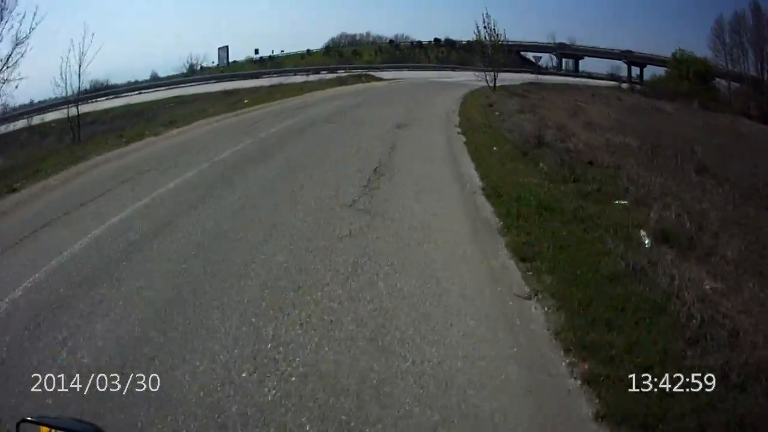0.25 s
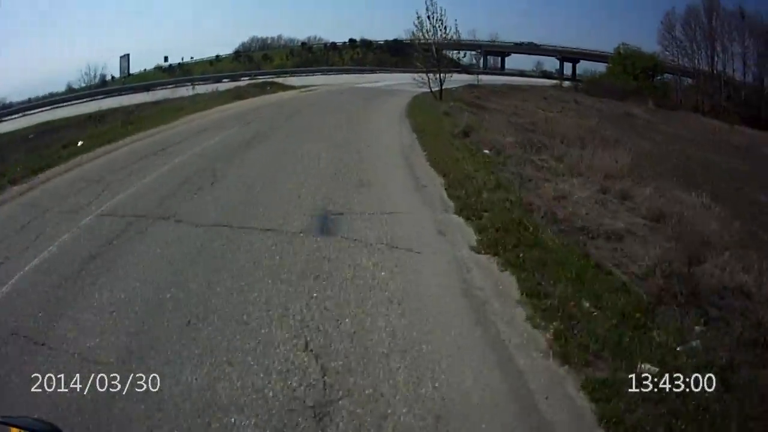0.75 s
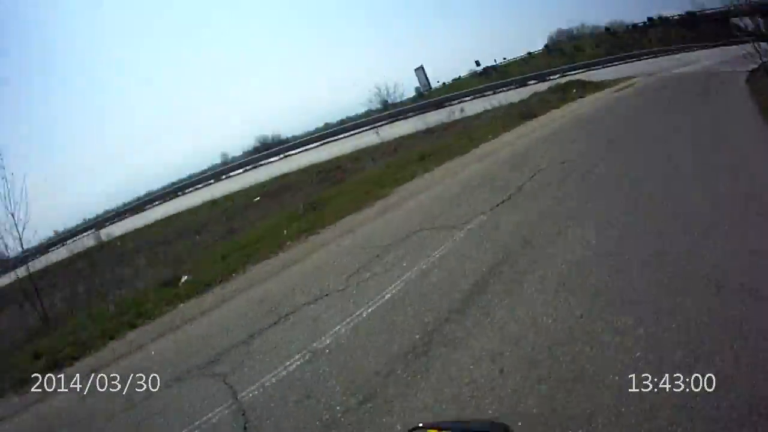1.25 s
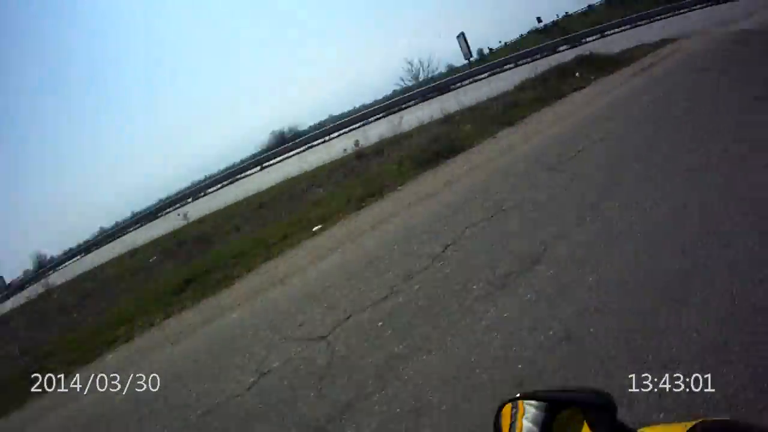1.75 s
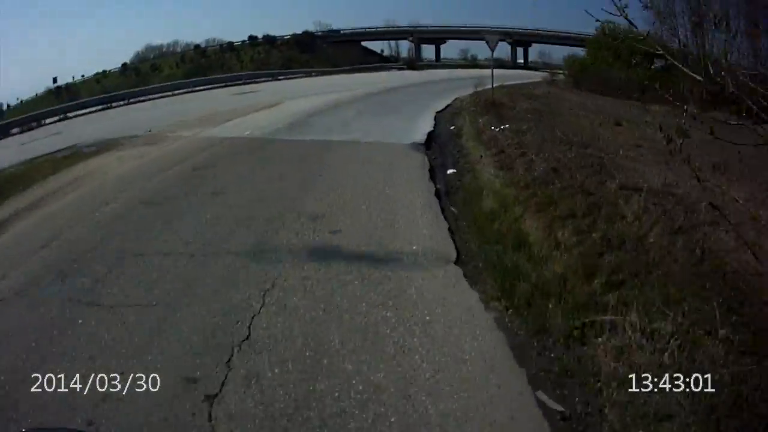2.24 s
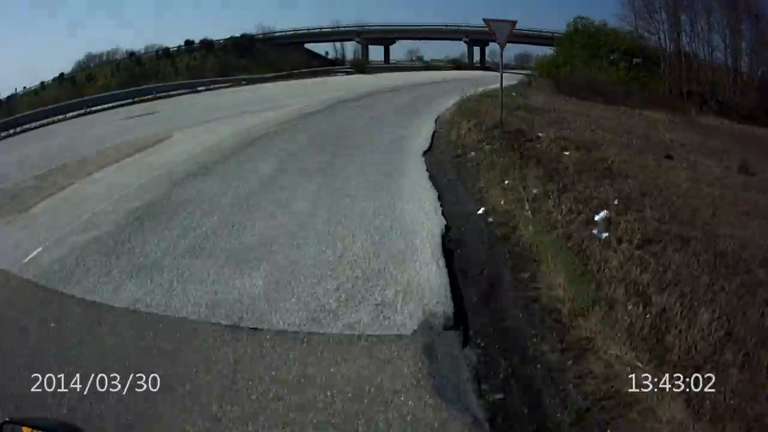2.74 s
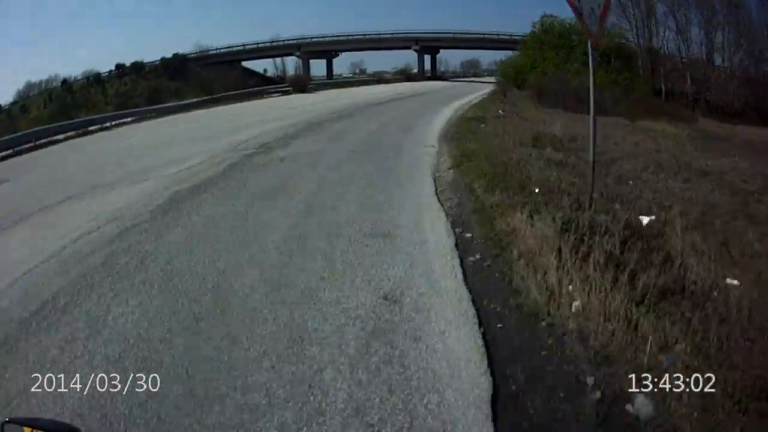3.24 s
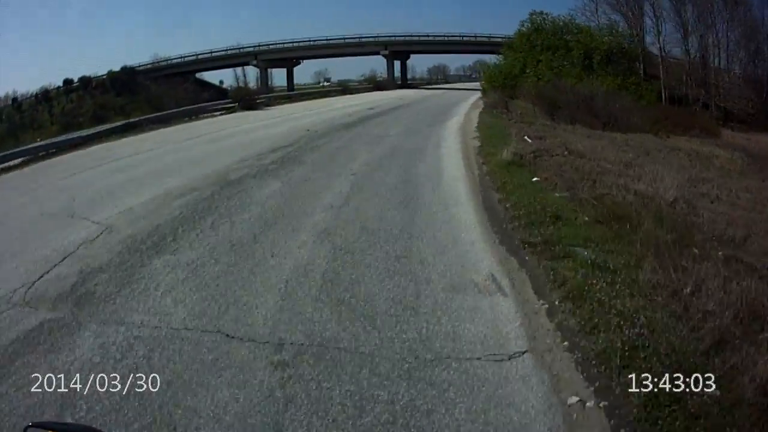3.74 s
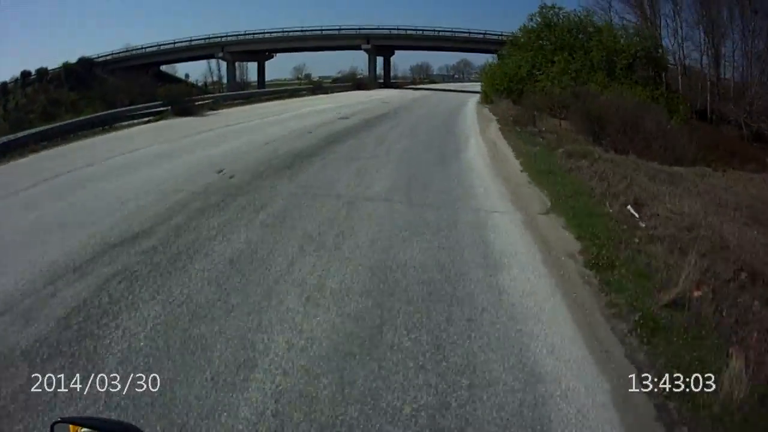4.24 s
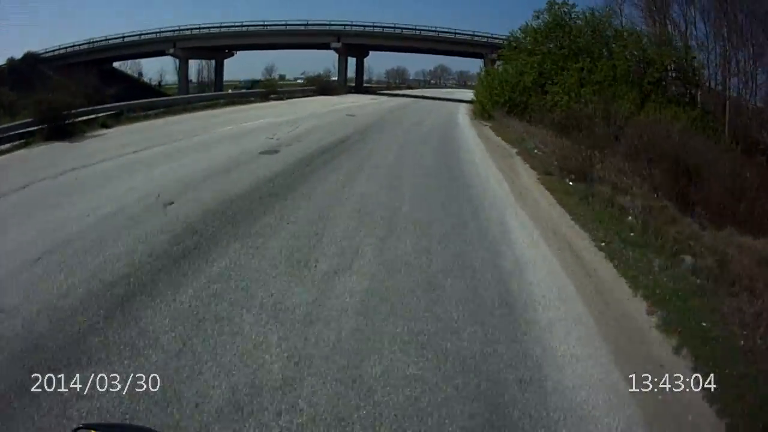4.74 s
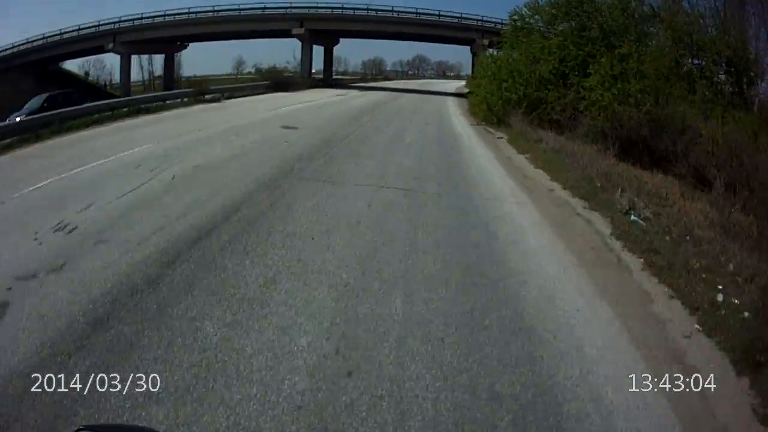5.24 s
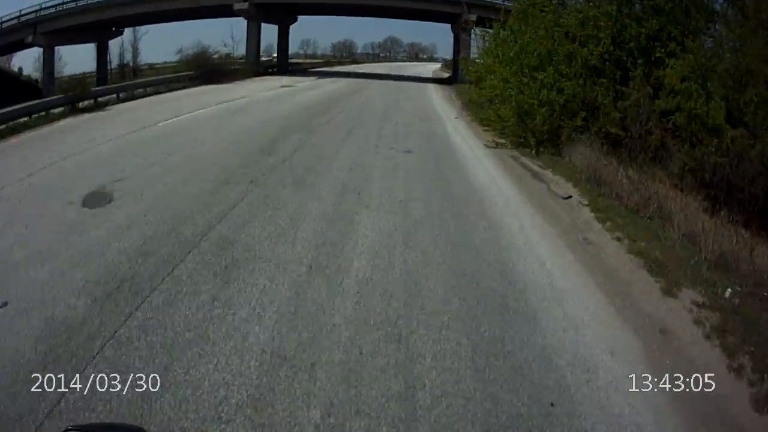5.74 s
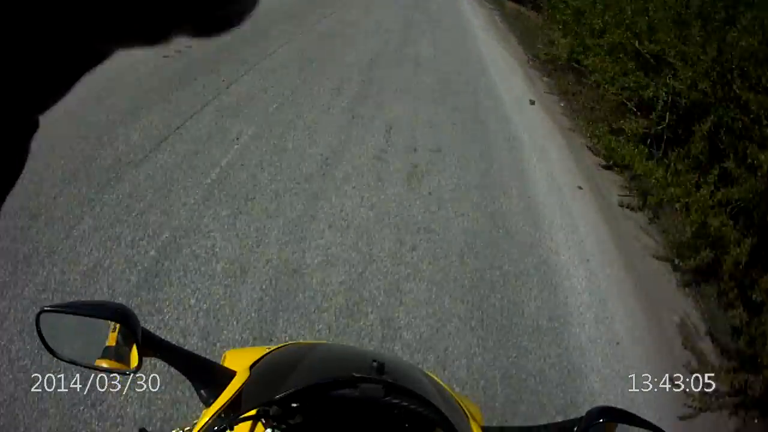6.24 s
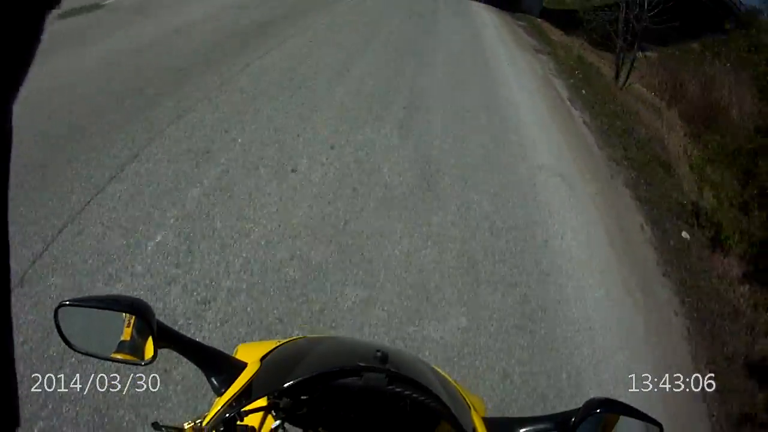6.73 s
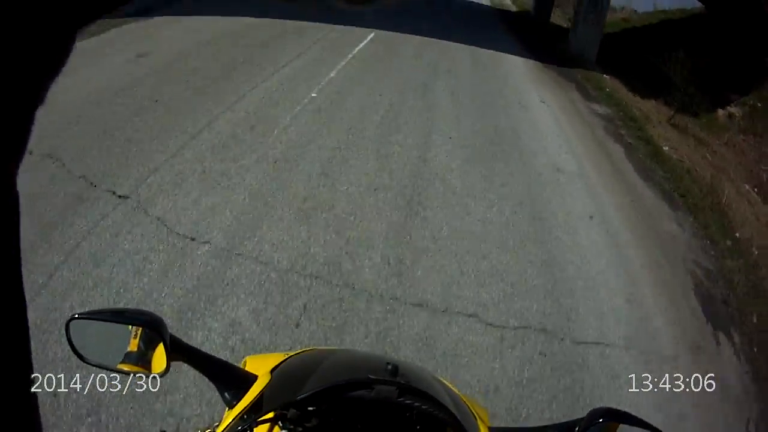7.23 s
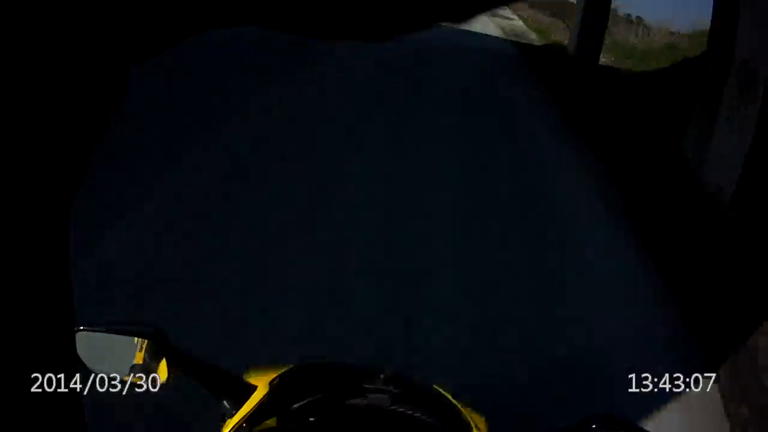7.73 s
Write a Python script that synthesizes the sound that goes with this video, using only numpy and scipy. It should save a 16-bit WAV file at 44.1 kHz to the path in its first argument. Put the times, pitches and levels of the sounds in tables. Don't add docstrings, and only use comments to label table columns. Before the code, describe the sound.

Muffled wind rushes over a camera housing on an accelerating motorcycle, engine humming faintly, then hard knocks, rubbing and crackling dropouts as a hand grabs the mount.

```python
import sys
import numpy as np
from scipy import signal
from scipy.io import wavfile
from scipy.ndimage import uniform_filter1d

SR = 44100
rng = np.random.default_rng(int(sys.argv[2]) if len(sys.argv) > 2 else 0)


def log_audio(samples):
    frames = np.atleast_2d(samples).T
    limited = np.clip(frames, -1, 1)
    pcm = np.round(limited * 32767).astype(np.int16)
    wavfile.write(sys.argv[1], SR, pcm)


def invert_db(x):
    u = np.asarray(x, float) / 20
    return 10 ** u


N = 351915

# lowest, centre and top frequency in Hz.
WIND_LAYERS = [(130, 350, 520), (520, 700, 1000), (1000, 1800, 2300), (2300, 3900, 7600)]
LAYER_TRIM_DB = [-1.1, -0.85, -0.45, -1.1]
LAYER_FOLLOWS_AIR = [0.43, .5, 0.98, 1.2]
# frequency in Hz, level in dB per Hz.
WIND_COLOUR = [(20, -68), (45, -47), (70, -31), (140, -24.5), (380, -14.5), (1000, -12.5), (1450, -15.5),
               (2150, -19.5), (2850, -28.5), (4600, -29), (5200, -38.5), (6650, -49), (8000, -59.5),
               (8800, -86.5)]
# frequency in Hz, width in Hz, boost in dB.
CAVITIES = [(1232, 254, 6.5), (1785.5, 410, 15), (2440, 310, 4), (3070, 210, 4.5), (3812, 700, 8),
            (4520, 290, 1), (6030, 620, 7.5), (7336, 770, 12)]
# time in seconds, level in dB.
AIR = [(0, -42.5), (1.88, -42), (1.99, -43.5), (2.1, -40), (2.4, -45.5), (3.32, -42.5), (3.42, -38.5),
       (3.66, -38), (3.8, -40), (4.22, -39), (4.33, -36), (5.0, -36), (5.7, -35.2), (6.2, -36), (6.58, -35),
       (6.72, -37.5), (7.6, -40), (7.98, -40.5)]
AIR_MEAN_DB = -40
WHISTLE_HZ, WHISTLE_WIDE_HZ = 730, 120

# buffet, port and fizz at mean air in dB,
# port whistle in dB, lift above 5 kHz in dB, further lift above 6.5 kHz in dB, upper engine orders in dB.
AHEAD = (-53, -45.5, -55, 9, 1, -0.8, 0.3)
ASIDE = (-55, -55.5, -49.5, 7, 5.5, 2, 3.5)
SWINGING = (-53, -57.5, -52.5, 6, 1.5, -4, -6)
TUCKED = (-51, -49.5, -53, 3.8, 4, -5.5, 0.6)
BOWED = (-47, -50.5, -53, 6, 3, 2.6, .1)
# start in seconds, length in seconds, new posture.
HEAD_MOVES = [
    (1.22, 0.054, ASIDE),
    (1.9, 0.025, SWINGING),
    (2.0, 0.11, AHEAD),
    (3.361, 0.18, TUCKED),
    (6.31, .05, BOWED),
]

# start in seconds, peak in dB, body tone in Hz (minus: first swing inward),
# edge level against the body in dB, ring time to -60 dB in seconds.
KNOCKS = [(6.3284, -9, 1000, -11, 0.008), (6.3325, -10.5, 850, 1, 0.0076), (6.3385, -22, 1207, 5, 0.005),
          (6.3455, -24, 1100, -13, 0.0084), (6.3445, -17, 266, -15, 0.013), (6.3484, -7.5, -620, -6, 0.006),
          (6.6053, -19.5, -600, -11, 0.0064), (6.6182, -16.5, 898, -9, 0.0081),
          (6.6345, -23, 385, -16, 0.011), (6.6715, -32, -400, 0, 0.0043), (6.878, -30.5, 143, 2.5, 0.024),
          (7.0264, -16.5, 296, -9, 0.0061), (7.0295, -28, 1498, -2, 0.023),
          (7.0395, -19.5, -300, -16, 0.024), (7.0463, -17.5, 1497, -20, 0.014),
          (7.1943, -2, -790, -1.5, 0.0078), (7.4051, -20.5, 791, -12.5, 0.0085),
          (7.4111, -23, 788, -3, 0.022), (7.7030, -37, 413, -6, 0.061), (7.92, -48, 391, -12, 0.028),
          (6.3345, -22.5, 1800, -3, .05), (6.6198, -20, 1389, -6, 0.022), (7.3100, -21.5, -500, -7, 0.0082)]
# start in seconds, peak in dB.
CAVITY_BURSTS = [(1.652, -33), (2.1905, -29), (6.6089, -27), (6.725, -35)]
# body tone in Hz, edge level in dB, ring time to -60 dB in seconds.
BURST_RING = (1780, -12, 0.028)
# frequency in Hz, level in dB, ring time to -60 dB in seconds.
SHELL_MODES = [(1420, -10.5, 0.03), (1786, 0.5, 0.015), (2420, -0.5, 0.0073), (3083, 3.5, 0.0073),
               (4340, -6.5, 0.0088)]
# frequency in Hz, level in dB per Hz.
GRIT_COLOUR = [(1500, -19), (2600, 9), (4700, 1.3), (6200, -11), (7900, -13.5), (8600, -43)]
GRIT_DB, GRIT_T60_S = -18.5, 0.015

# top in seconds, length in seconds, thump in dB,
# boom in the housing against the thump in dB.
PUSHES = [(6.346, 0.047, -35, 7), (6.438, .1, -43, 14), (6.475, .1, -55, 2), (6.57, 0.085, -48.5, -9),
          (6.659, 0.14, -41, 6), (6.87, 0.16, -46.5, 9), (7.045, 0.11, -40.5, -2.5),
          (7.185, 0.1, -41, -3.5), (7.31, 0.098, -48, 7), (7.336, .08, -61, -4), (7.455, 0.13, -34.5, 5),
          (7.503, .06, -53, -3), (7.618, .1, -47, .1), (7.705, .16, -53, 10), (7.962, 0.083, -41, 2)]
# top in seconds, length in seconds, rush in dB,
# port against the rush in dB, rustle in dB.
RUBS = [(6.319, 0.062, -23.5, -15.5, -69), (6.338, 0.034, -21.5, -4.5, -47),
        (6.418, 0.097, -49, -16, -67.5), (6.498, 0.22, -40.5, 3.5, -60.5), (6.65, 0.14, -35.5, -10, -56),
        (7.043, 0.078, -34, 5, -61.5), (7.189, 0.11, -48, 6, -76), (7.326, 0.09, -51, 9, -65),
        (7.35, .05, -61, 14, -72), (7.431, 0.12, -32.5, -12, -60.5), (7.455, .06, -41, -10, -65),
        (7.52, 0.055, -34, -7, -63), (7.702, .2, -40.5, -21, -67)]
# frequency in Hz, level in dB per Hz.
THUMP_COLOUR = [(15, -25), (35, -7), (65, -1.0), (110, 0.5), (180, -3.5), (260, -42)]
# frequency in Hz, level in dB per Hz.
RUSTLE_COLOUR = [(8000, -8), (8700, -39), (9100, -36.5), (9500, -13), (10600, -10), (11200, -8),
                 (12500, -3), (13500, -4.5), (15000, -2), (15800, -17.5), (16000, -44)]
GRIP_S, GRIP_THUMP_DB, GRIP_RUSTLE_DB = 6.27, -62, -72.5
GLOVE_LAG_S = .038
SWELL_DB, RISE_SHARE = 16.5, 0.52
RUB_FIZZ_DB = 3
RUB_BRIGHT_DB = -63.5

# contact lost in seconds, contact back in seconds,
# signed voltage jump when lost, signed voltage jump when back.
BREAKS = [(6.3400, 6.3435, .03, 0), (6.3468, 6.3484, 0, 0), (6.3695, 6.4152, 0, .1),
          (6.4222, 6.4705, -.13, -.04), (6.8630, 6.8664, .045, .1), (7.0428, 7.0456, .08, .1),
          (7.3125, 7.3328, .13, .06), (7.3500, 7.3960, -.055, 0), (7.4330, 7.4330, .1, 0),
          (7.4382, 7.4382, .13, 0), (7.4583, 7.5118, .085, .19), (7.5203, 7.5905, -.055, -.04)]
POP_LEAD_S = .00015

# time in seconds, engine order one in Hz.
CRANK = [(0, 81.6), (1.65, 81.7), (1.9, 80.6), (2.5, 78.7), (2.9, 78.8), (3.4, 79.9), (3.9, 82.2),
         (4.3, 84.6), (5.1, 90.6), (5.8, 96.4), (6.1, 98.6), (6.8, 100.5), (7.1, 101.5)]
# time in seconds, load from 0 to 1.
THROTTLE = [(.85, 0.4), (1.25, 0.44), (1.7, 0.4), (1.9, .05), (2.6, 0.17), (4.1, 0.62), (4.8, 0.97),
            (6.8, 1), (7.98, 0.65)]
# order, level coasting in dB, level at full load in dB.
LOADED_ORDERS = [(1, -74.5, -64), (3, -84, -57), (4, -77.5, -55.5), (5, -69, -66.5)]
# order, level against order one in dB.
WEAK_ORDERS = [(2, -18)]

# frequency in Hz, level in dB per Hz.
HISS_COLOUR = [(8000, -39), (9000, -21), (9600, -11), (10600, -8), (11200, 0.5), (12500, 0.5), (13600, 0),
               (15000, 8), (15200, -41)]
HISS_DB = -80.5


def evened(x):
    return x / np.sqrt(np.mean(x ** 2) + 1e-20)


def smooth_noise(size, passes=1):
    x = rng.standard_normal(N)
    for _ in range(passes):
        x = uniform_filter1d(x, size=size)
    return evened(x)


def read(points, hz):
    f, value = np.transpose(points)
    return np.interp(np.log(hz + 1), np.log(f + 1), value, -120, -120)


def follow(table, t):
    s, *columns = np.transpose(table)
    return [np.interp(t, s, c) for c in columns]


def add(mix, s, sound):
    part = mix[round(s * SR):][:len(sound)]
    part += sound[:len(part)]


def noise(field_db, size):
    a, b = rng.standard_normal(field_db.shape[::-1] + (2,)).T
    spectra = (a + 1j * b) * invert_db(field_db)
    return signal.istft(spectra, nperseg=size, noverlap=size * 3 // 4)[1][:N]


def steady(spectrum, size):
    colour = read(spectrum, np.fft.rfftfreq(size, 1 / SR))
    return evened(noise(np.repeat(colour[:, None], N * 4 // size + 5, axis=1), size=size))


def wind(patchy_db=1.0, gust_db=0.82, rumble_db=-2.2):
    hz, t = np.fft.rfftfreq(1024, 1 / SR), np.arange(N // 256 + 5) * 256 / SR
    colour = wind_colour(hz[:, None], t)
    share = [invert_db(2 * colour[(lo <= hz) & (hz < hi)]).sum(0) for lo, _, hi in WIND_LAYERS]
    lift_db = layers(t) + np.c_[LAYER_TRIM_DB] - 10 * np.log10(share)
    centres = np.log([c for _, c, _ in WIND_LAYERS])
    blend = np.array([np.interp(np.log(hz + 1), centres, row) for row in np.eye(4)])
    rumble = np.clip(np.log(260 / (hz[:, None] + 1)), 0, 1)
    field = (1 - rumble) * (blend.T @ lift_db) + rumble * (np.median(lift_db[0]) + rumble_db)
    patches = uniform_filter1d(rng.standard_normal((len(t), len(hz))), size=5, axis=0)
    patches = evened(uniform_filter1d(patches, size=14, axis=1)).T
    gusts = smooth_noise(900)
    return invert_db(62.5 + gust_db * gusts) * noise(colour + field + patchy_db * patches, size=1024) / 1024


def wind_colour(hz, t):
    whistle_db, top_db, crest_db = posture(t)[3:6]
    top_db = top_db + np.maximum(grip(t)[1] - RUB_BRIGHT_DB, 0)
    colour = read(WIND_COLOUR, hz) + sum(db * .5 ** ((2 * (hz - f) / w) ** 2) for f, w, db in CAVITIES)
    colour = colour + whistle_db / (1 + (2 * (hz - WHISTLE_HZ) / WHISTLE_WIDE_HZ) ** 2)
    colour = colour + top_db * np.clip((hz - 4000) / 2000, 0, 1)
    return colour + crest_db * np.clip((hz - 6200) / 500, 0, 1)


def layers(t):
    air_db = follow(AIR, t)[0] - AIR_MEAN_DB
    buffet, port, fizz = posture(t)[:3]
    blown_db = np.array([buffet, port, AIR_MEAN_DB + 0 * t, fizz]) + np.c_[LAYER_FOLLOWS_AIR] * air_db
    push_top, push_length, thump_db, boom_db = np.transpose(PUSHES)
    rub_top, rub_length, rush_db, port_db, rustle_db = np.transpose(RUBS)
    fizz_db = (rush_db + rustle_db) / 2 + RUB_FIZZ_DB
    touched = [swells(push_top, push_length, thump_db + boom_db, t)]
    touched += [swells(rub_top, rub_length, db, t) for db in (rush_db + port_db, rush_db, fizz_db)]
    return 10 * np.log10(invert_db(2 * blown_db) + touched)


def posture(t):
    rows, old = [], AHEAD
    for s, takes, new in HEAD_MOVES:
        rows += [(s, *old), (s + takes, *new)]
        old = new
    return follow(rows, t)


def knocks():
    out, t = np.zeros(N), np.arange(2600) / SR
    blows = KNOCKS + [(s, db, *BURST_RING) for s, db in CAVITY_BURSTS]
    detune = rng.uniform(1.0, 1.04, (len(blows), len(SHELL_MODES)))
    grit = steady(GRIT_COLOUR, size=256)
    tick = np.diff(np.exp(-((t - .0010) / .00003) ** 2), prepend=0)
    rise = np.sin(np.pi / 2 * np.minimum(t / 0.00087, 1)) ** 2
    for (s, peak_db, hz, edge_db, t60), shift in zip(blows, detune):
        body = np.sin(2 * np.pi * hz * t) * invert_db(-60 * t / max(t60, .003))
        edge = invert_db(GRIT_DB + 10.5 - 60 * t / GRIT_T60_S) * grit[round(s * SR):][:len(t)]
        for (f, db, ring_s), k in zip(SHELL_MODES, shift):
            edge = edge + invert_db(db - 60 * t / ring_s) * np.sin(2 * np.pi * f * k * t)
        ring = (body + invert_db(edge_db - 13.0) * edge) * rise
        add(out, s, invert_db(peak_db + 6.5) * ring + invert_db(4.4 * peak_db - 3) * tick)
    return out


def hand():
    t, ms = np.arange(N) / SR, np.arange(GRIP_S, 8, .001)
    thump_db, rustle_db = [np.interp(t, ms, db) for db in grip(ms)]
    touching = np.clip((t - GRIP_S) / .02, 0, 1)
    sliding = t > GRIP_S + GLOVE_LAG_S
    thump = invert_db(thump_db + 2.0) * steady(THUMP_COLOUR, size=2048)
    rustle = invert_db(rustle_db + 2.0) * steady(RUSTLE_COLOUR, size=512)
    return touching * (thump + sliding * rustle)


def grip(t):
    push, rub = np.transpose(PUSHES), np.transpose(RUBS)
    thump = swells(*push[:3], t) + invert_db(2 * GRIP_THUMP_DB)
    rustle = swells(*rub[:2], rub[4], t) + invert_db(2 * GRIP_RUSTLE_DB)
    return 10 * np.log10([thump, rustle])


def swells(top, length, db, t):
    late = (t[:, None] - top) / length
    drop_db = SWELL_DB * np.maximum(-late / RISE_SHARE, late / (1 - RISE_SHARE))
    return invert_db(2 * (db - drop_db)).sum(1)


def contact():
    t, touch = np.arange(N) / SR, np.ones(N)
    for lost, back, _, _ in BREAKS:
        touch *= np.clip(np.maximum(lost - t, t - back) / 0.00066 + .5, 0, 1)
    return touch


def contact_pops():
    out, u = np.zeros(N), np.arange(800) / SR
    shape = (1 - np.exp(-(u / 0.00014) ** 2)) * (np.exp(-u / 0.00053) - 0.11 * np.exp(-u / 0.001))
    for lost, back, jump_off, jump_on in BREAKS:
        add(out, lost - POP_LEAD_S, 2.0 * jump_off * shape)
        add(out, back - POP_LEAD_S, 1.7 * jump_on * shape)
    return out


def engine():
    t = np.arange(N) / SR
    (hz,), (load,) = follow(CRANK, t), follow(THROTTLE, t)
    turns = np.cumsum(hz) / SR
    orders = [(k, coasting_db + (full_db - coasting_db) * load) for k, coasting_db, full_db in LOADED_ORDERS]
    orders = orders + [(k, orders[0][1] + db) for k, db in WEAK_ORDERS]
    out, open_db = np.zeros(N), posture(t)[6]
    for k, db in orders:
        level_db = db + open_db * (k > 3) + 1.3 + .9 * smooth_noise(3000, passes=2)
        out += np.sqrt(2) * invert_db(level_db) * np.sin(2 * np.pi * (k * turns + rng.random()))
    return out


def hiss():
    lift_db = np.maximum(posture(np.arange(N) / SR)[4], 0)
    return invert_db(HISS_DB + lift_db) * steady(HISS_COLOUR, size=512)


def thinned_treble(x):
    hz, t, z = signal.stft(x, SR, window="cosine", nperseg=2048, noverlap=1024)
    hz, power = hz[:, None], abs(z) ** 2
    local = uniform_filter1d(power, size=40, axis=0)
    strict = np.repeat(rng.standard_normal((len(t), 41)), 25, axis=1).T
    weak = power < local * invert_db(2 * (1.5 + 4 * strict))
    lost = weak & (hz > 6400) & (local < invert_db(-2 * 88))
    air_db = follow(AIR, t)[0]
    raised = strict[0] > np.interp(air_db, [-42, -40, -38.1, -38], [.4, 3, 3, .6])
    edge_hz = np.where(air_db > -38, 13600, 14300) + 700 * raised
    lost |= (hz > edge_hz) & (t < GRIP_S + .035)
    return signal.istft(z * ~lost, SR, window="cosine", nperseg=2048, noverlap=1024)[1][:N]


def scene():
    return (wind() + knocks() + hand() + engine())[None]


def roll_off(x):
    return signal.sosfilt(signal.butter(12, 16400, fs=SR, output="sos"), x)


def record(dry):
    limited = np.clip(dry[0], -.7, .72)
    heard = thinned_treble(limited + hiss()) * contact()
    mix = heard + contact_pops()
    return roll_off(mix[None])


dry = scene()
out = record(dry)
log_audio(out)
```